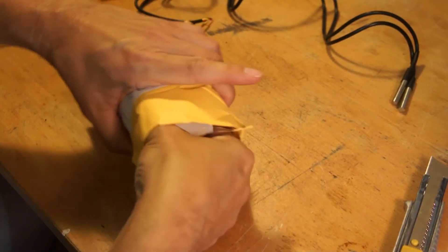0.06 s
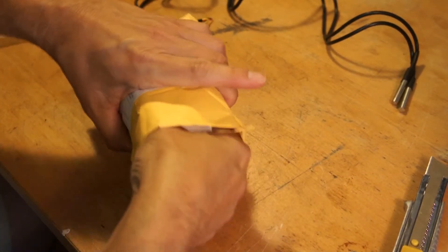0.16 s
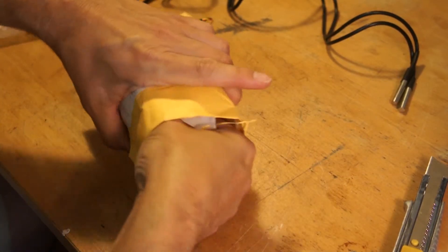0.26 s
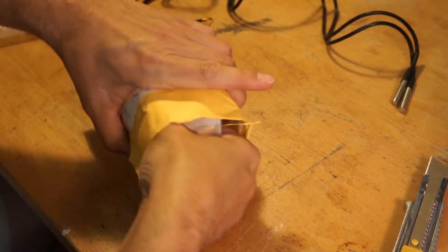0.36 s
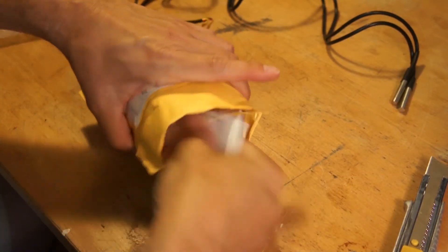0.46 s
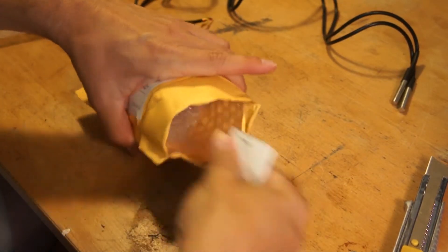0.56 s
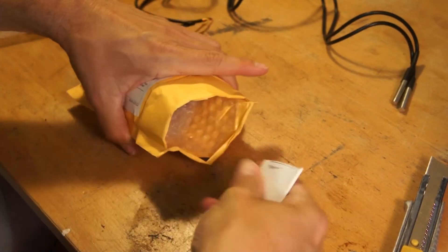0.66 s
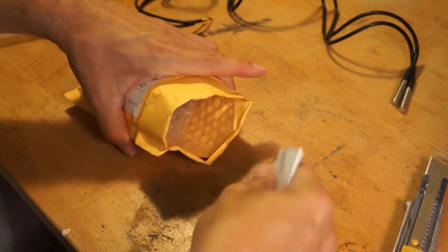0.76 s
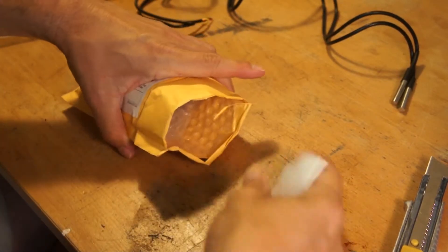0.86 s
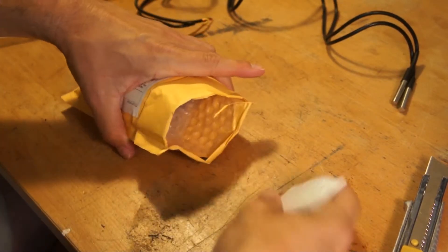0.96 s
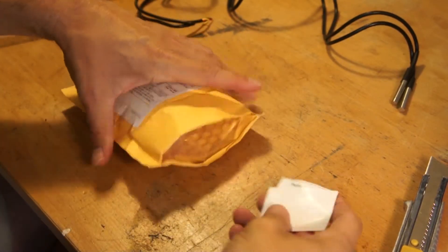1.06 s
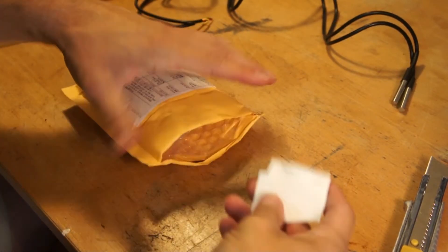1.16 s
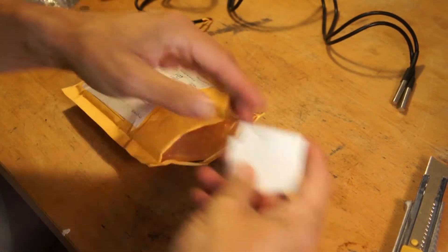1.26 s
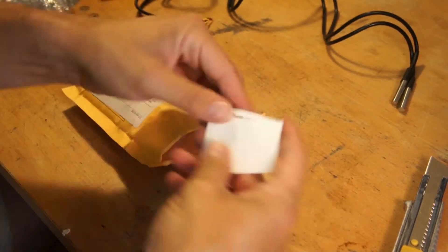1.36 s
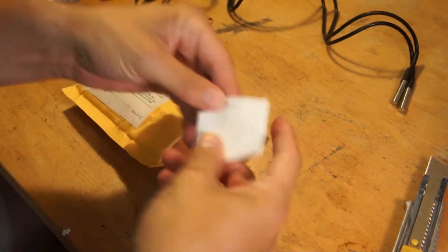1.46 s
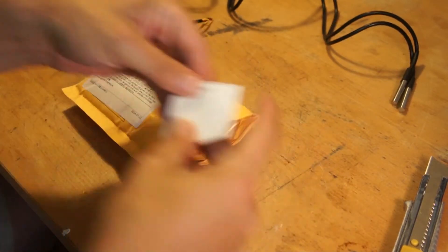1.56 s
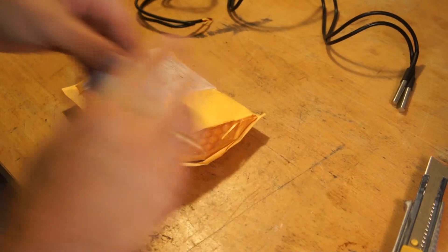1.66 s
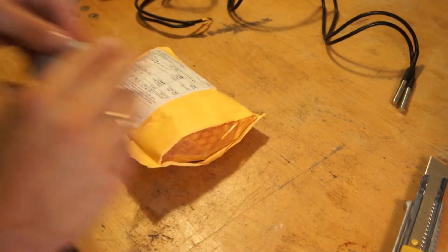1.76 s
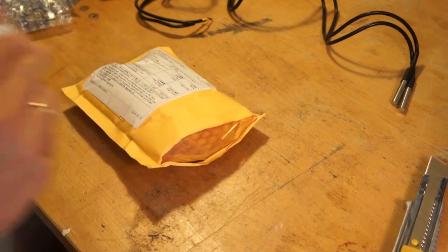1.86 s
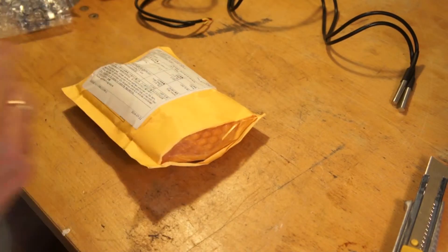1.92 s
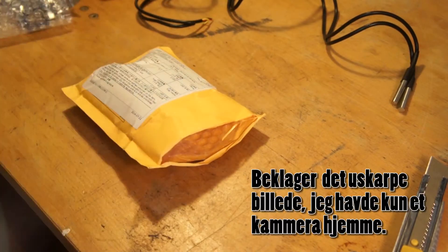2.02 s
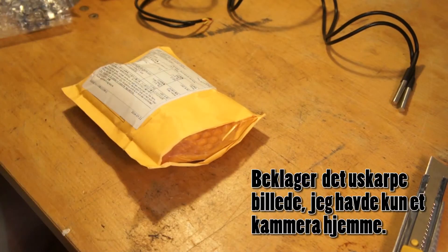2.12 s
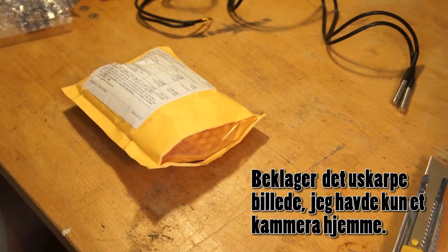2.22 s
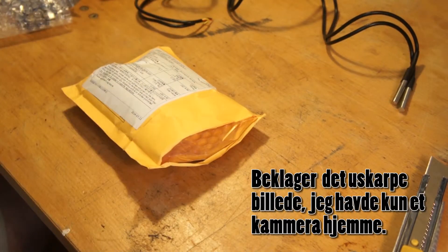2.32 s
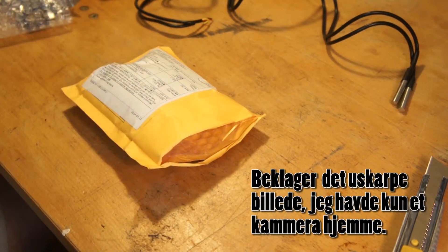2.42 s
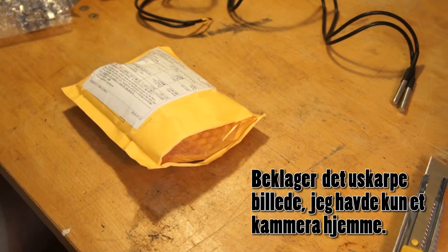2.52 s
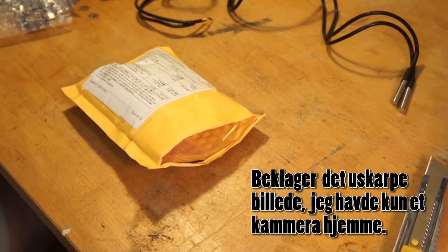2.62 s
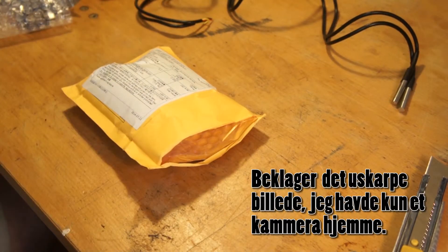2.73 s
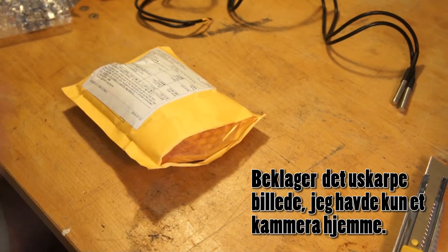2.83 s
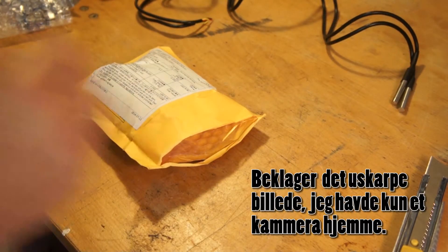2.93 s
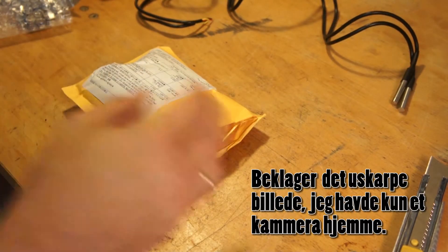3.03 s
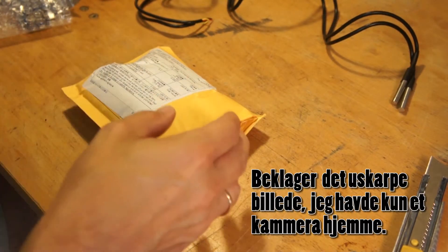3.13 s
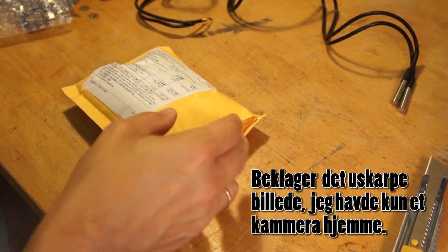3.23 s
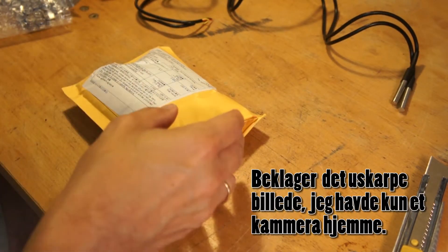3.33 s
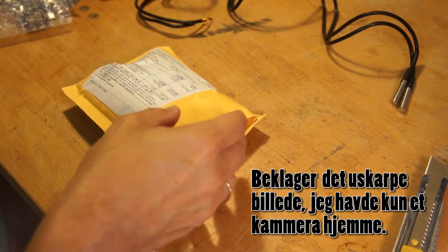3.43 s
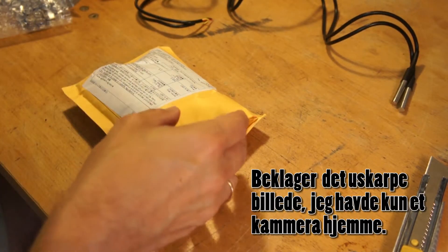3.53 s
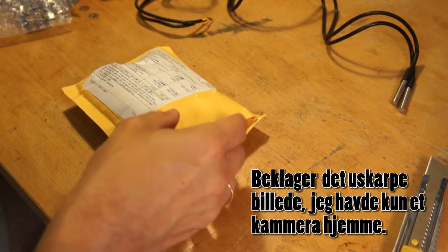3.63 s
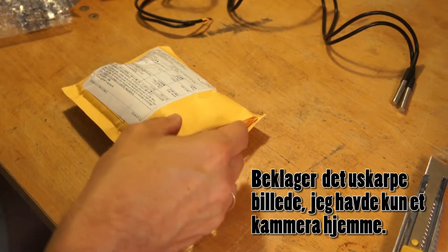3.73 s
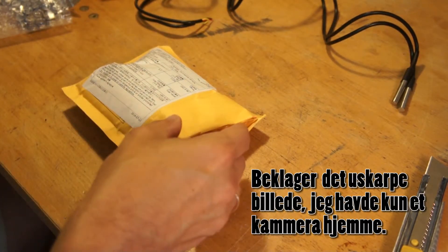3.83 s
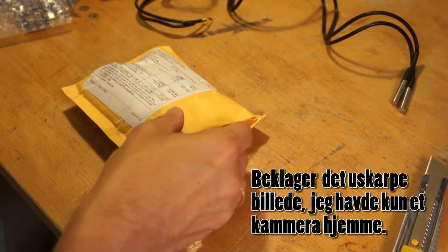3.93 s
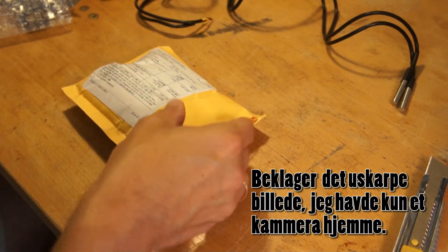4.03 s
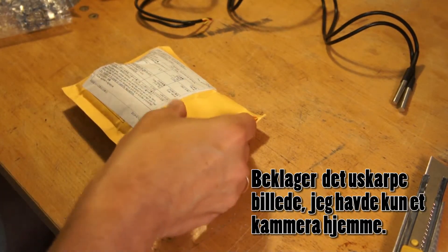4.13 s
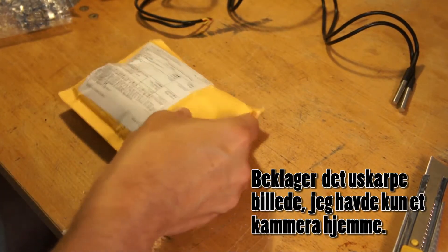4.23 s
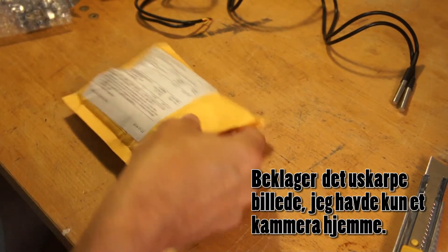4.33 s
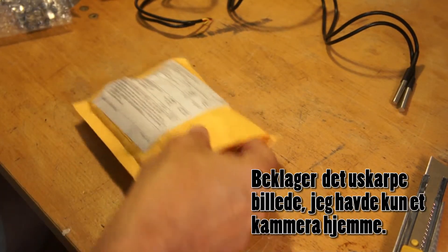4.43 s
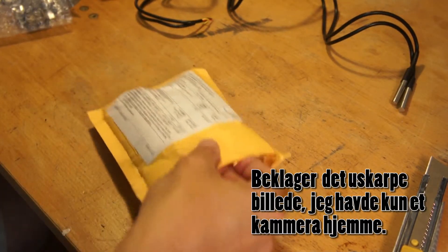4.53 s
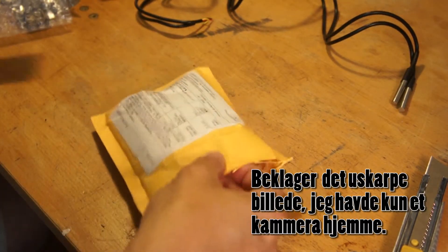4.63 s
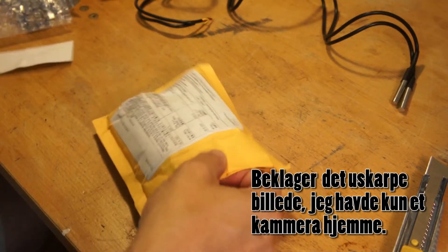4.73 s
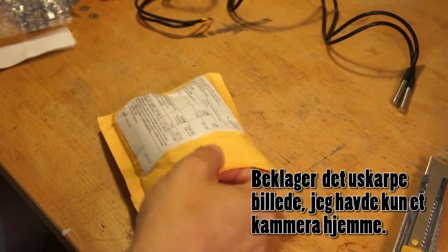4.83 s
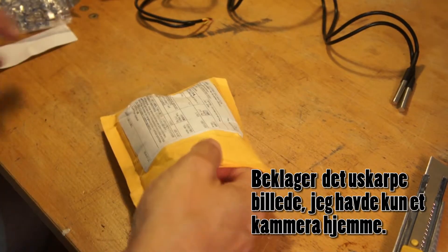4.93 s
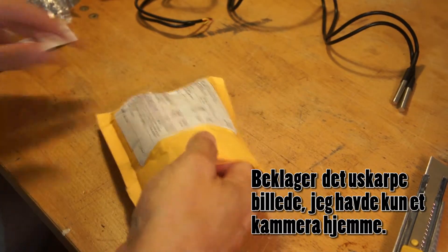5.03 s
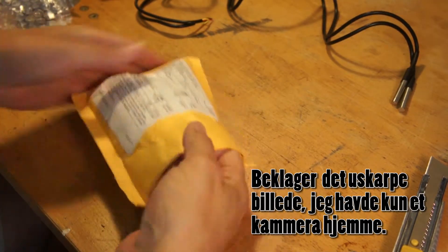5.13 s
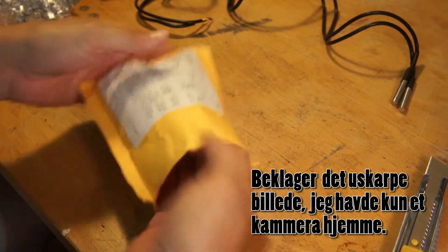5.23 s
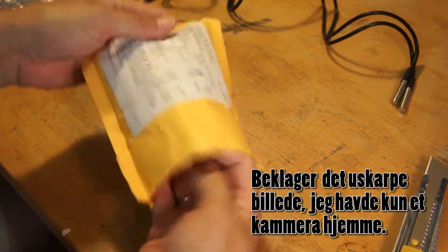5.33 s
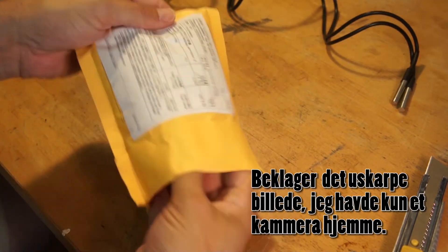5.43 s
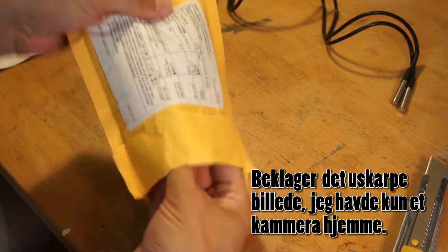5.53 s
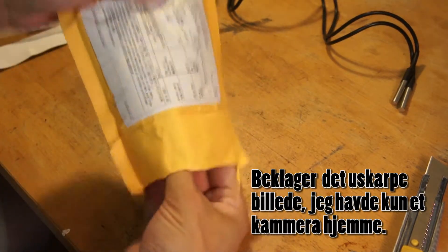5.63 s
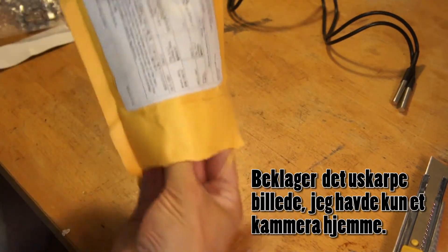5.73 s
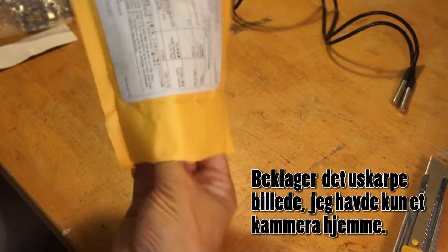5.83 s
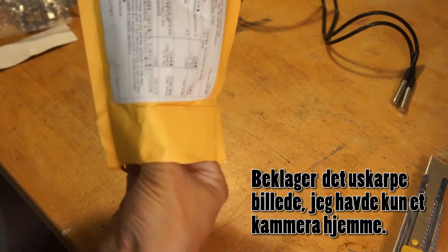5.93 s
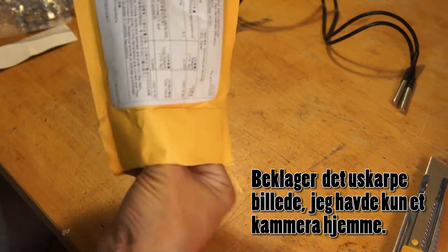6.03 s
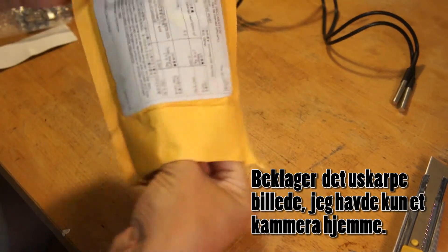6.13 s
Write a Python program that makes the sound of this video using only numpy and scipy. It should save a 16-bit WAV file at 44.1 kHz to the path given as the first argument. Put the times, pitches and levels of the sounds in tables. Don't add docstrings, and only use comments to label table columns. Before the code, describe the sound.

Hands rustle paper out of a padded envelope on a wooden bench, pause quietly, then crinkle it harder with sharp snaps and soft knocks.

```python
import sys
import numpy as np
from scipy import signal
from scipy.fft import rfft, irfft
from scipy.io import wavfile
from scipy.ndimage import uniform_filter1d

SR = 44100
rng = np.random.default_rng(int(sys.argv[2]) if len(sys.argv) > 2 else 0)


def transcribe(u):
    v = np.clip(np.atleast_2d(u).T, -1, 1)
    q = np.round(v * 32767).astype(np.int16)
    wavfile.write(sys.argv[1], SR, q)


def volts(x):
    e = np.asarray(x, float) / 20
    return 10 ** e


N = 272097


def at_hz(points, hz):
    points = np.array(points)
    return np.interp(np.log(np.maximum(hz, 1)), np.log(points[:, 0]), points[:, 1])


def rms_one(x):
    return x / np.sqrt(np.mean(x ** 2) + 1e-20)


def band(x, low_hz, high_hz, order=2):
    return signal.sosfilt(signal.butter(order, [low_hz, high_hz], "band", fs=SR, output="sos"), x)


def colour(x, spectrum):
    hz = np.fft.rfftfreq(x.shape[-1], 1 / SR) + 1
    lowest_hz, highest_hz = spectrum[0][0], spectrum[-1][0]
    skirt = 1 / np.sqrt(1 + (lowest_hz / hz) ** 8 + (hz / highest_hz) ** 8)
    return rms_one(irfft(rfft(x) * volts(at_hz(spectrum, hz)) * skirt, x.shape[-1]))


def drift(rate_hz):
    r = np.exp(-2 * np.pi * rate_hz / SR)
    chance = rng.standard_normal(N + SR)
    return rms_one(signal.lfilter([1], [1, -2 * r, r * r], chance)[SR:])


def ring(clicks, hz, t60):
    r, w = volts(-60 / (t60 * SR)), 2 * np.pi * hz / SR
    return signal.lfilter([0, np.sin(w)], [1, -2 * r * np.cos(w), r * r], clicks + 1e-18)


def floor():
    # frequency in Hz, likeness of left and right from -1 to 1.
    likeness = [(40, -0.18), (150, 0.35), (400, -0.17), (1500, -0.67), (5000, -0.42), (12000, -0.37)]
    # frequency in Hz, density in dB per Hz.
    spectrum = [(22, -42), (50, -25), (65, -12.5), (100, -6.5), (170, -3.5), (300, -1), (500, -4),
                (800, -8.5), (1200, -9.5), (2000, -14.5), (3000, -17), (5000, -20.5), (9000, -25),
                (12500, -18)]
    # frequency in Hz, level in dB rms, wander in Hz.
    hum = [(61.7, -68, 3.3), (182.8, -60.5, 3.12)]
    floor_db, whine_db = -51, -77
    mid, side = rfft(rng.standard_normal((2, N)))
    alike = np.clip(at_hz(likeness, np.fft.rfftfreq(N, 1 / SR)), -1, 1)
    pair = np.sqrt(1 + alike) * mid + np.sqrt(1 - alike) * side * [[1], [-1]]
    out = volts(floor_db + 2 + 0.14 * drift(25)) * colour(irfft(pair, N), spectrum)
    whine = rms_one(band(rng.standard_normal((2, N)), 10440, 10520))
    out += volts(whine_db + 3.4 * drift(1.5)) * whine
    for hz, db, wander_hz in hum:
        phase = 2 * np.pi * np.cumsum(hz + wander_hz * drift(3.5)) / SR
        out += volts(db + 3 + 2 * drift(2.6)) * np.sin(phase + rng.uniform(0, 5.5, (2, 1)))
    return out


def far_metal():
    # start in seconds, frequency in Hz, level in dB, swell in seconds, t60 in seconds.
    modes = [
        (2.205, 1396, -52, .015, 1.5),
        (2.285, 1068, -54, .03, 1.3),
        (2.3, 1690, -60, .08, 1.4),
        (3.40, 1408, -55, .02, 1.3),
        (3.45, 1068, -55, .04, 1.1),
        (3.5, 1705, -61, .05, 1.0),
    ]
    t, out = np.arange(N) / SR, np.zeros((2, N))
    for s, hz, db, swell, t60 in modes:
        age = np.maximum(t - s, 0)
        shape = (1 - np.exp(-age / swell)) * volts(db - 60 * age / t60 + 2 * drift(12))
        out += shape * np.sin(2 * np.pi * hz * t + rng.uniform(0, np.pi / 2, (2, 1)))
    return out


def room(x):
    # frequency in Hz, t60 in seconds.
    decay_times = [(300, 0.097), (2000, 0.15), (10000, 0.11)]
    room_db, gap_s = -9, 0.0044
    t, tail = np.arange(SR // 2) / SR, 0
    for low in 150 * 2. ** np.arange(7):
        decay = volts(-60 * t / at_hz(decay_times, low * np.sqrt(2))) * (t > gap_s)
        tail = tail + band(rng.standard_normal((2, len(t))), low, 2 * low) * decay
    tail = volts(room_db) * tail / np.sqrt(np.mean(np.sum(tail ** 2, axis=1)))
    return signal.fftconvolve(x.mean(axis=0)[None], tail, axes=1)[:, :N]


def thuds():
    # start in seconds, peak in dB, centre in Hz.
    knocks = [(.612, -30, 420), (4.688, -34.5, 503), (1.959, -28, 510), (2.215, -42, 400),
              (2.418, -36, 477), (2.449, -37, 503), (3.883, -40, 490), (5.122, -22.5, 486), (5.2, -31, 278),
              (5.342, -28, 356), (5.447, -22.5, 520), (5.711, -23.5, 466), (5.88, -29, 450),
              (5.935, -26, 340), (5.96, -31, 305)]
    t60, rumble_db = 0.011, -21.5
    out, t = np.zeros(N + SR), np.arange(SR // 8) / SR
    for s, db, hz in knocks:
        push = volts(rumble_db - 60 * t / 0.053) * rng.standard_normal(len(t))
        push[0] = 1
        at = round(s * SR)
        out[at:at + len(t)] += volts(db) * (ring(push, hz, t60) + 0.51 * ring(push, 1.52 * hz, t60))
    return band(out[:N], 290, 1100)


def squeaks():
    # start in seconds, level in dB, frequency in Hz, length in seconds.
    folds = [(.025, -39.5, 644, 0.056), (.62, -46, 800, 0.017), (5.871, -41, 660, 0.132),
             (0.301, -47.5, 1960, 0.043), (4.224, -43, 1270, 0.0089), (4.274, -44, 1240, 0.015),
             (4.44, -37.5, 1360, 0.01), (4.589, -57, 1200, 0.049), (4.595, -46, 1940, 0.028),
             (4.818, -47, 1510, 0.051), (5.205, -51, 3000, 0.023), (5.63, -39, 2210, 0.031),
             (3.538, -53, 3280, 0.016), (3.56, -49.5, 5170, 0.025)]
    t60, fade_db_per_s = 0.023, 500
    t, out = np.arange(SR // 4) / SR, np.zeros((2, N + SR))
    for s, db, hz, length in folds:
        common, *own = rng.standard_normal((3, len(t)))
        slips = common + 0.36 * np.array(own)
        slips = slips * volts(-fade_db_per_s * np.maximum(t - length, 0))
        at = round(s * SR)
        out[:, at:at + len(t)] += volts(db - 19.5) * ring(slips, hz, t60)
    return out[:, :N]


def ticks():
    # start in seconds, peak in dB, centre in Hz, after-crackle in dB.
    bubbles = [(1.356, -27, 5640, -11), (1.4073, -33, 8900, -6), (1.436, -29, 5400, -19),
               (1.8846, -21, 6460, -7), (2.4483, -30.5, 6000, -5), (2.491, -30.5, 7440, -1),
               (4.0263, -22.5, 8600, -0.5), (4.066, -45, 3000, -6), (4.139, -38, 7000, 4),
               (4.1736, -28, 4730, 2.5), (4.282, -31, 4200, 2.5), (4.5483, -27, 8500, -10),
               (4.7164, -22.5, 6530, -9), (4.9635, -27.5, 9050, 4), (5.2577, -26.5, 4000, 6.5),
               (5.329, -24, 8000, 6), (5.4236, -24, 7440, 2.5), (5.7614, -16.5, 8900, -4.5)]
    burst_t60, fizz_t60 = 0.0015, 0.12
    out, size = np.zeros((2, N + SR)), SR // 8
    t = np.arange(size) / SR
    for s, db, hz, after_db in bubbles:
        burst = volts(-60 * t / burst_t60) * rng.standard_normal(size)
        fizz = volts(after_db - 9.5 - 60 * t / fizz_t60) * rng.standard_normal((2, size))
        sliver = band(burst + fizz, hz / 1.8, min(hz * 1.45, 16000), order=1)
        at = round(s * SR)
        out[:, at:at + size] += volts(db + 3.5) * sliver
    return band(out[:, :N], 1300, 22000)


def handling():
    # full force at in seconds, hold in seconds, paper level in dB,
    # brightness in dB (raises the film, lowers the pocket).
    strokes = [(0.028, 0.054, -35.5, 5.5), (0.198, 0.048, -42, 6), (0.27, 0.1, -46, 2),
               (0.47, 0.074, -41, 7.5), (0.58, 0.0067, -36, 3), (1.08, 0.054, -45, 2.5),
               (1.43, 0.016, -53.5, 9), (1.53, 0.013, -58, 15.5), (1.79, 0.0086, -54, 8.5),
               (1.89, 0.11, -50.5, 7.5), (2.21, 0.41, -54.5, -3), (2.56, .03, -65, 12),
               (2.71, .012, -67, 7), (3.43, .09, -56.5, -28), (3.54, 0.088, -50.5, 2.5),
               (3.88, 0.012, -44, -13.5), (3.94, 0.099, -47, -3), (4.05, 0.057, -53, 3.5),
               (4.21, 0.12, -47, 0.5), (4.38, 0.23, -46.5, 1.5), (4.7, 0.023, -45, -1.5),
               (4.79, 0.18, -45, 3), (5.03, 0.44, -46.5, 1), (5.264, 0.0093, -36, 1.5),
               (5.32, 0.055, -44.5, 9), (5.468, 0.038, -35.5, 5), (5.56, 0.21, -43, 4),
               (5.862, 0.11, -36.5, 3.5), (6.01, 0.089, -44, 0.5), (6.155, .03, -47, 11)]
    # pocket, paper and film in dB.
    rest_db = (-59.5, -60, -59.5)
    rise_db_per_s, fall_db_per_s = 332, 216
    pocket_under_db, pocket_share = -2.5, 0.25
    t, power = np.arange(N) / SR, volts(2 * np.array(rest_db))[:, None]
    for s, hold, db, bright_db in strokes:
        before, after = np.maximum(s - t, 0), np.maximum(t - s - hold, 0)
        force_db = db - rise_db_per_s * before - fall_db_per_s * after
        parts_db = np.array([[pocket_under_db - pocket_share * bright_db], [0], [bright_db]])
        power = power + volts(2 * parts_db) * volts(2 * force_db)
    return 10 * np.log10(power)


def creases(per_s, spread_db, clump_db):
    sizes = volts(spread_db * np.minimum(rng.exponential(1, (2, N)), 4))
    signs = rng.choice([-1, 1], (2, N))
    happens = rng.random((2, N)) < per_s * volts(clump_db * drift(25)) / SR
    return sizes * signs * happens


def creaks():
    born = rng.random(N) < 70 / SR
    patch = rng.integers(0, 12, N)
    sizes = volts(7.3 * np.minimum(rng.exponential(1, N), 3))
    slips, fade = rng.standard_normal((2, N)), volts(-60 / (0.017 * SR))
    out = np.zeros((2, N))
    for k, hz in enumerate(np.geomspace(650, 3200, 12)):
        force = signal.lfilter([1], [1, -fade], sizes * born * (patch == k))
        out += ring(slips * force, hz, 27.0 / hz)
    return rms_one(out)


def rustle():
    # frequency in Hz, density in dB per Hz.
    pocket_hiss = [(250, 1.5), (400, -0.5), (650, 0), (800, 1.5), (1200, -12)]
    paper_hiss = [(1200, 1.5), (1600, 0.5), (2200, -1), (2800, -3), (3500, -7)]
    film_hiss = [(3500, -1.5), (4500, -1), (6500, 0), (8000, 0.5), (10000, -0.5), (12000, -3)]
    right_lag_s, creak_db = 9e-5, -8.5
    folds = creases(per_s=7000, spread_db=2.0, clump_db=2.0)
    pocket_db, paper_db, film_db = handling()
    pocket = volts(pocket_db + 0.72 * drift(22)) * colour(folds, pocket_hiss)
    paper = volts(paper_db + 1.58 * drift(31.5)) * colour(folds, paper_hiss)
    film = volts(film_db + 1.0 * drift(45)) * colour(folds, film_hiss)
    one, other = volts(-2.5) * (pocket + paper + film)
    left = one + 0.1 * other
    right = 1.007 * other + 0.19 * np.roll(one, round(right_lag_s * SR))
    return np.array([left, right]) + volts(paper_db + creak_db) * creaks()


def snaps():
    # start in seconds, paper peak in dB, paper pitch in Hz, pocket in dB, film in dB (relative).
    buckles = [(4.9871, -22.5, 1110, -5, -20), (0.4541, -22, 2320, 1.5, -19),
               (0.4609, -24.5, 1320, -28, -21), (0.5694, -28.5, 1980, -1, -8), (0.58, -26, 1860, -35, -4.5),
               (0.6115, -37, 1250, 11, -23), (1.8484, -25.5, 3050, -8, -26), (1.8871, -20.5, 2070, -8, -11),
               (1.9575, -26.5, 1840, 1.5, -2.5), (3.8804, -29.5, 1280, 9, -21.5),
               (4.4423, -33.5, 1380, -33, -14), (4.6882, -47, 1540, 8, -8), (4.7632, -20.5, 3430, -14, -13),
               (4.9757, -14, 1370, -6.5, -25.5), (5.0832, -29.5, 1340, -28, -13.5),
               (5.1224, -48, 1290, 24.5, -2), (5.181, -28, 2970, -17, -17), (5.338, -12, 1720, -12, -14),
               (5.447, -5, 2260, -6.5, -15), (5.4863, -27, 1550, -20, -20), (5.613, -31, 1250, 1, -18),
               (5.7097, -25.5, 1400, 4.5, -14.5), (5.83, -21, 1500, -4.5, -48), (5.84, -29, 1920, 4, -37)]
    # frequency in Hz, level in dB, t60 in seconds.
    pocket_modes = [(470, -38, 0.075), (686, -1.5, 0.078), (848, 4.5, 0.012), (1080, -5, 0.0054)]
    # frequency in Hz, level in dB.
    film_colour = [(3500, 8), (5500, 7), (7800, 8.5), (10000, 4.5), (12000, 4.5)]
    lead_s, paper_t60, after_t60 = 0.0009, 0.004, 0.083
    echo_s, echo_gain = 0.000395, 0.3
    crackle_db, dull_crackle = -4.5, 0.26
    out, size = np.zeros((2, N + SR)), SR // 8
    t = np.arange(size) / SR - lead_s
    bright = volts(at_hz(film_colour, np.fft.rfftfreq(size, 1 / SR)))
    duller = signal.butter(2, 3800, fs=SR, output="sos")
    for s, db, hz, pocket_db, film_db in buckles:
        after_db = crackle_db - dull_crackle * film_db - 0.4 * max(db + 28, 0)
        jolt = volts(-3 + 0.5 * after_db - 60 * np.abs(t) / 0.003) * rng.standard_normal(size)
        jolt[round(lead_s * SR)] = np.clip(1.54 + 0.038 * (db + 7), 0.2, 1)
        jolt += echo_gain * np.interp(t - echo_s, t, jolt, left=0)
        jolt = np.array([jolt, np.roll(jolt, rng.integers(2, 4))])

        common, *own = rng.standard_normal((3, size))
        slips = (0.76 * common + 0.91 * np.array(own)) * (rng.random(size) < 0.3)
        jolt += volts(after_db - 9.0 - 60 * t / after_t60) * slips * (t > 0.001)

        overtone = 1.53 + 0.29 * rng.normal()
        paper = ring(jolt, hz, paper_t60) + 0.55 * ring(jolt, hz * overtone, paper_t60)
        paper += 0.45 * ring(jolt, hz * 0.7, paper_t60)
        pocket = np.zeros((2, size))
        for mode_hz, mode_db, t60 in pocket_modes:
            c = rng.normal()
            pocket += volts(mode_db + 1.63 * c) * ring(jolt, mode_hz * volts(0.5 * c), t60)
        film = band(irfft(rfft(jolt) * bright, size), 3400, 11200)

        paper, pocket = paper / np.abs(paper).max(), pocket / np.abs(pocket).max()
        body = signal.sosfilt(duller, volts(5.5) * paper + volts(pocket_db) * pocket)
        at = round(s * SR)
        out[:, at:at + size] += volts(db - 1.0) * (body + volts(film_db + 17) * film)
    return band(out[:, :N], 610, 19500)


def scene():
    soft = rustle()
    sharp = snaps() + ticks() + thuds() + squeaks()
    return soft + sharp + room(sharp + volts(-2.5) * soft) + far_metal() + floor()


def roll_off(x):
    return signal.sosfilt(signal.butter(12, 16510, fs=SR, output="sos"), x)


def record(dry):
    treble_top_hz, quiet_db = 12950, -58
    whistle_db, edge_db = -68, -68
    under = signal.sosfiltfilt(signal.cheby2(10, 40, treble_top_hz, fs=SR, output="sos"), dry)
    treble = np.mean(band(dry, 3000, 16000) ** 2, axis=0) + 1e-12
    fast_db = 10 * np.log10(uniform_filter1d(treble, size=128))
    slow_db = 10 * np.log10(uniform_filter1d(treble, size=2048))
    crack = np.clip((fast_db - slow_db - 6) / 4, 0, 1)
    strong = np.clip(fast_db / 10 + 2.7, 0, 1)
    heard = under + (dry - under) * volts(-10) * crack * strong
    quiet = 1 / (1 + volts(4 * (slow_db - quiet_db)))
    whistle = rms_one(band(rng.standard_normal(dry.shape), 14800, 15300))
    edge = rms_one(band(rng.standard_normal(dry.shape), 12300, 13200, order=4))
    heard += quiet * (volts(whistle_db) * whistle + volts(edge_db) * edge)
    return roll_off(np.clip(heard, -1, 1))


dry = scene()
out = record(dry)
transcribe(out)
```